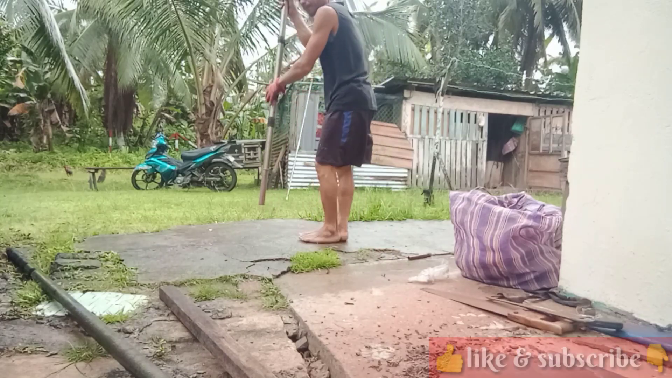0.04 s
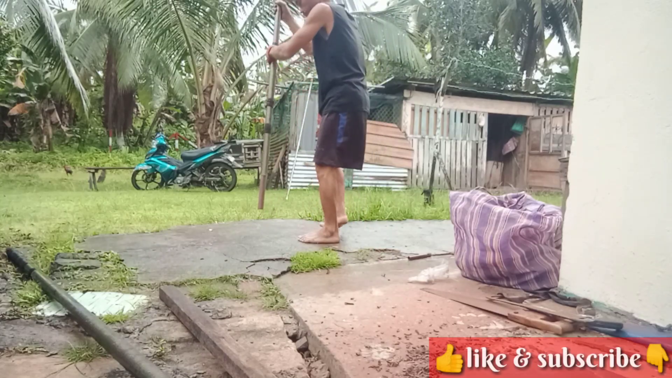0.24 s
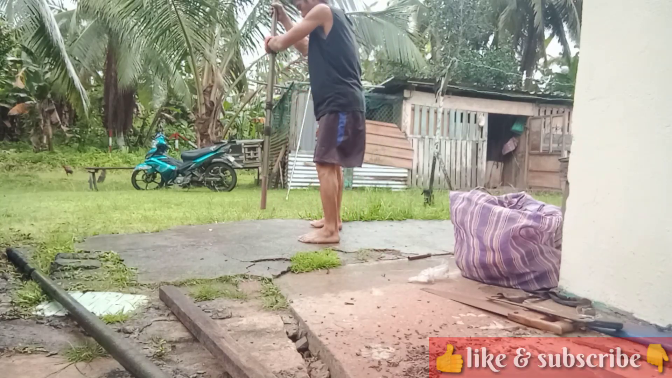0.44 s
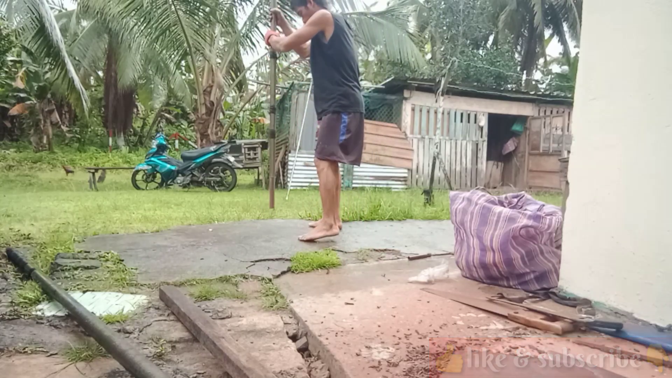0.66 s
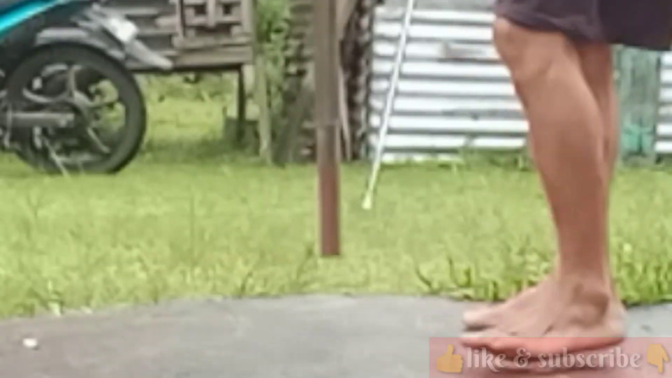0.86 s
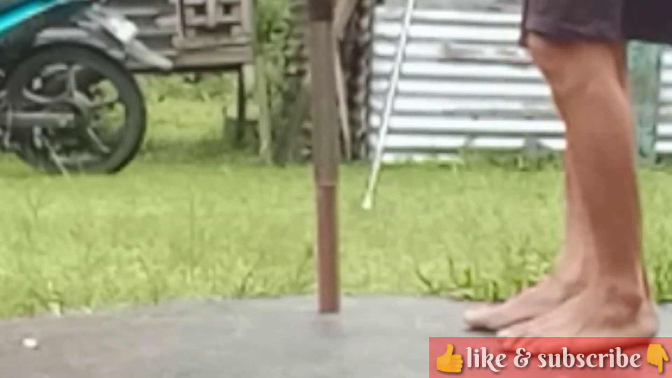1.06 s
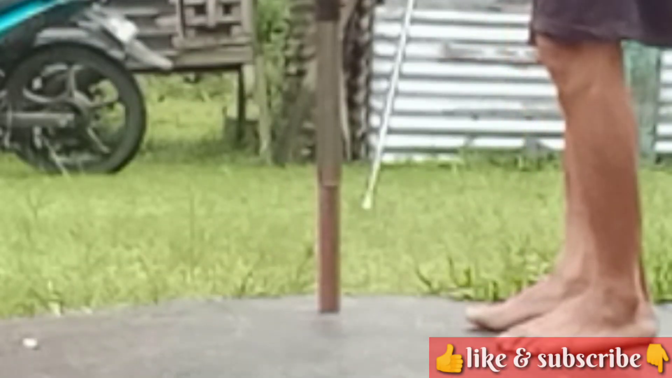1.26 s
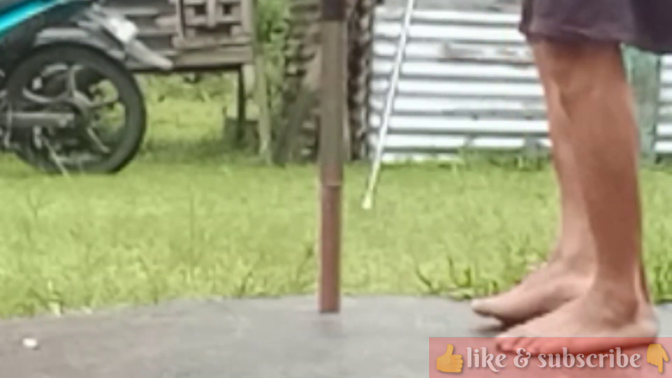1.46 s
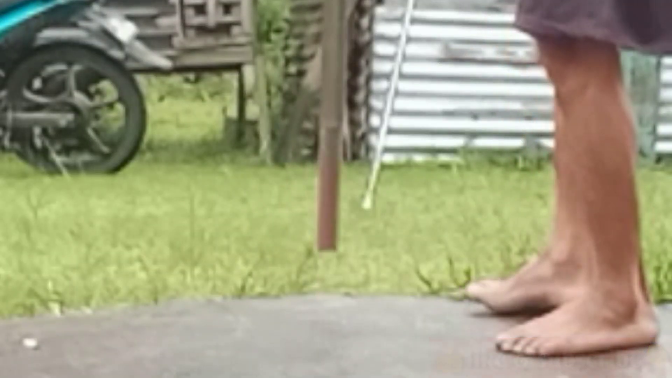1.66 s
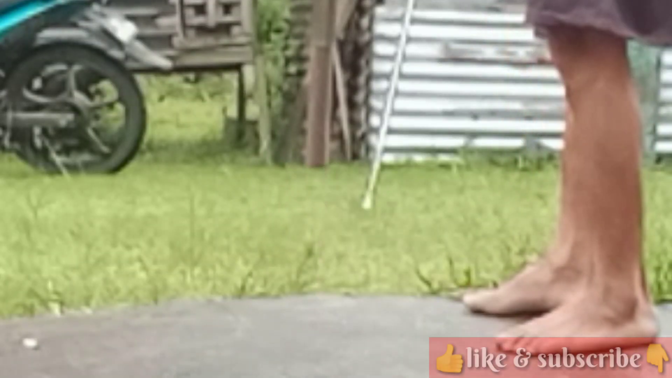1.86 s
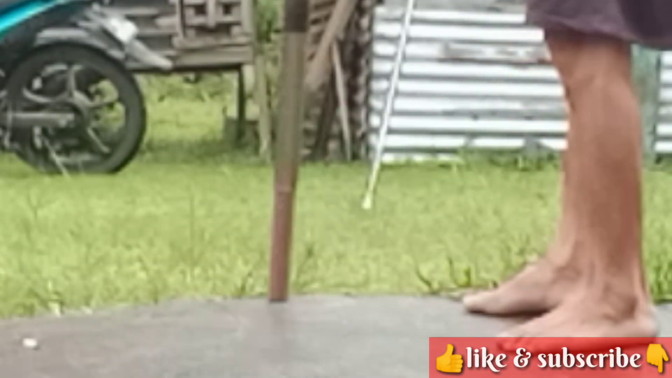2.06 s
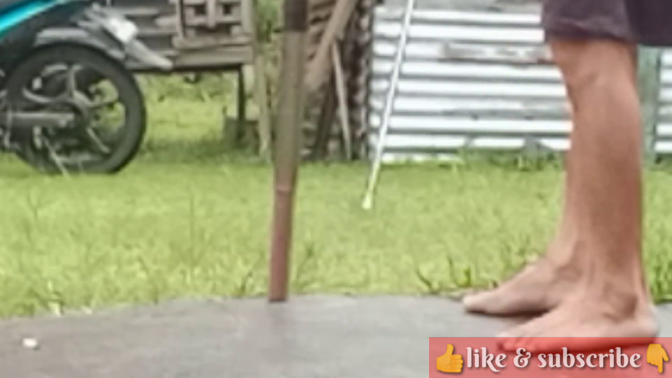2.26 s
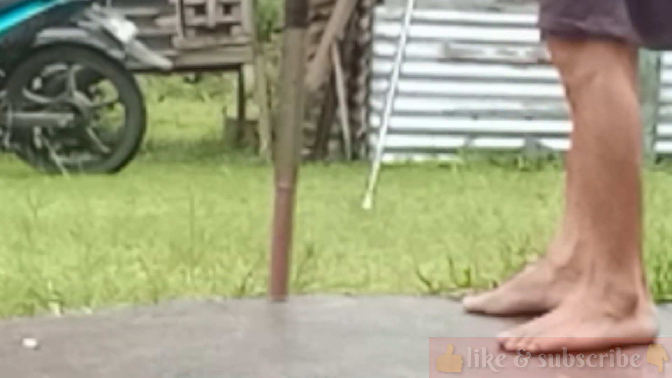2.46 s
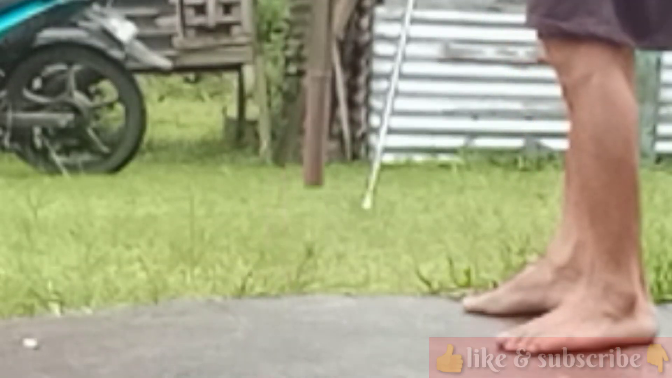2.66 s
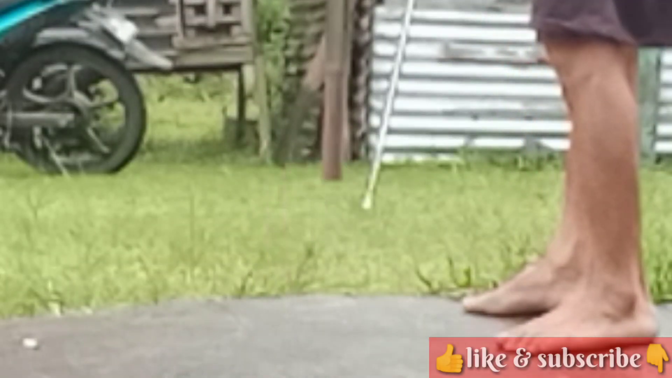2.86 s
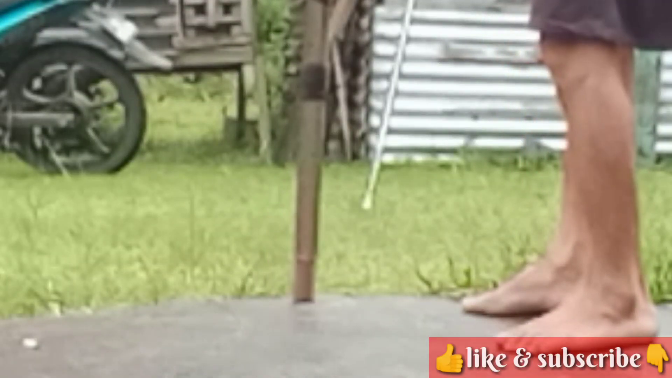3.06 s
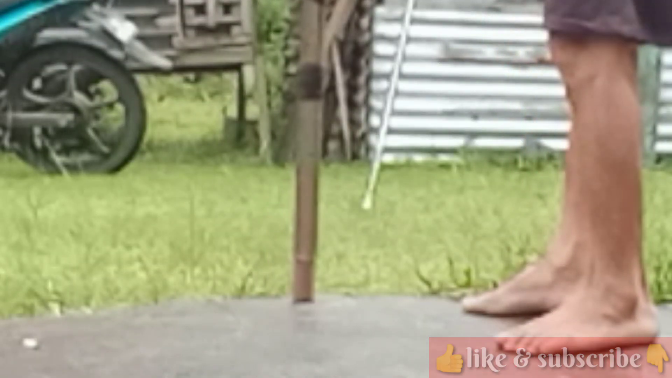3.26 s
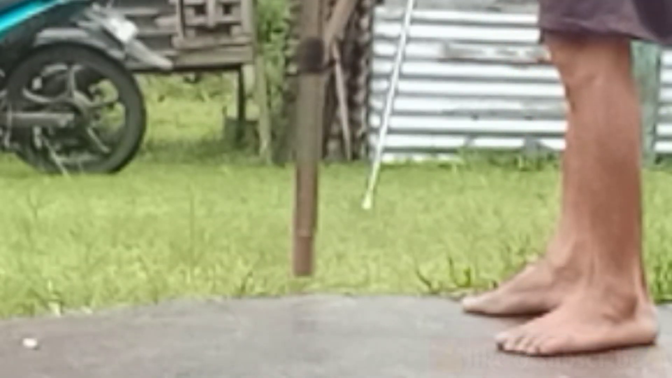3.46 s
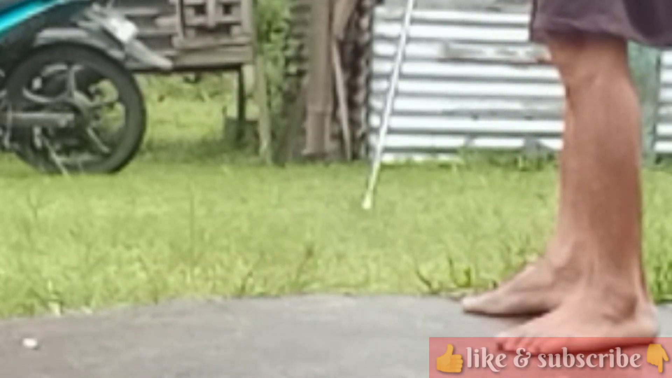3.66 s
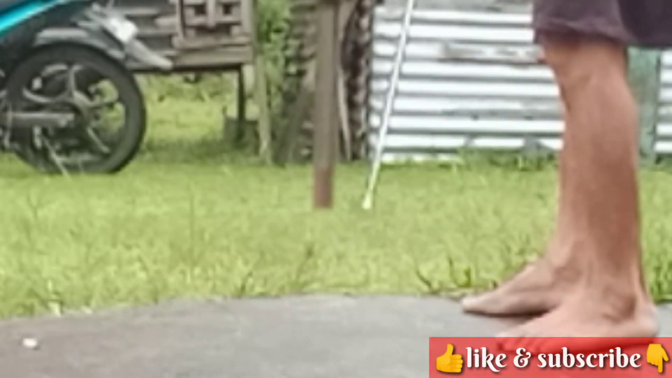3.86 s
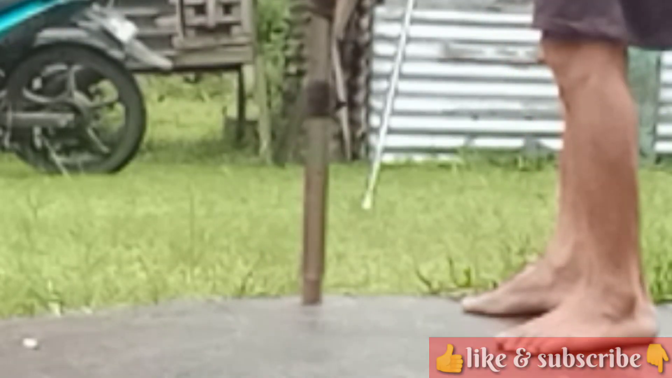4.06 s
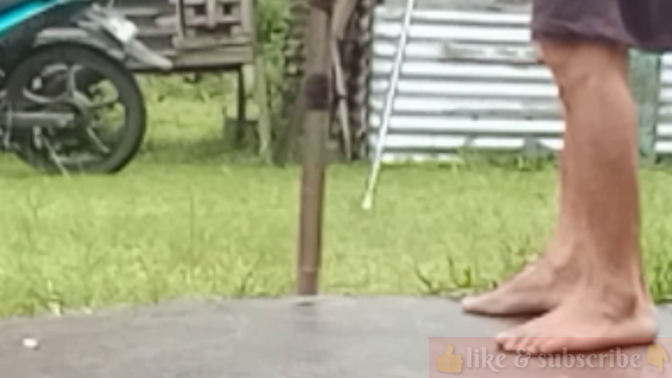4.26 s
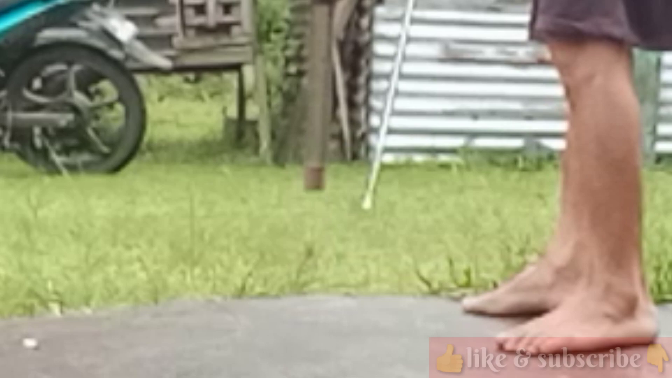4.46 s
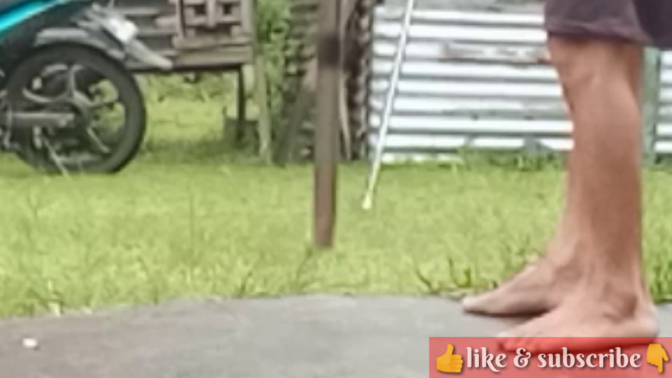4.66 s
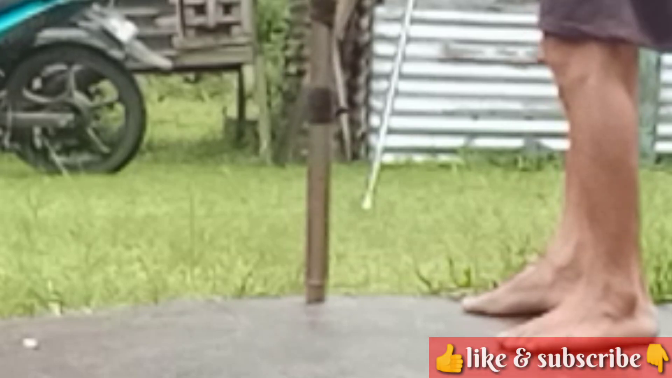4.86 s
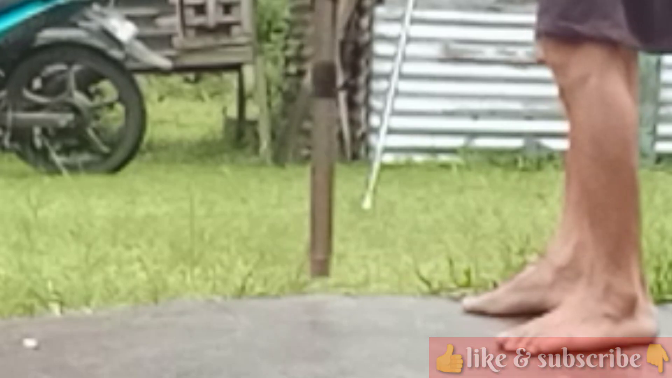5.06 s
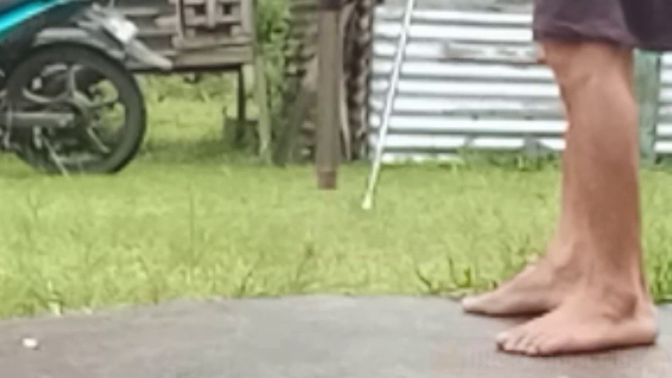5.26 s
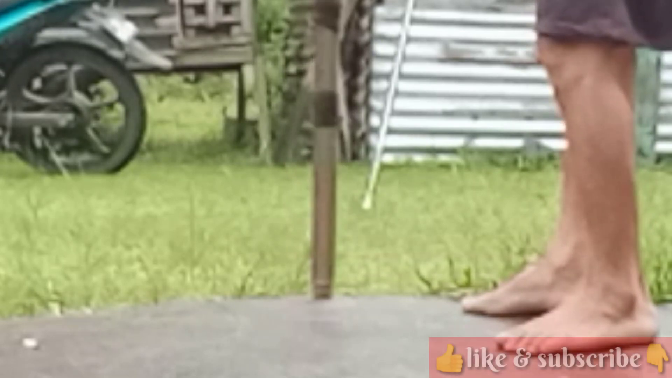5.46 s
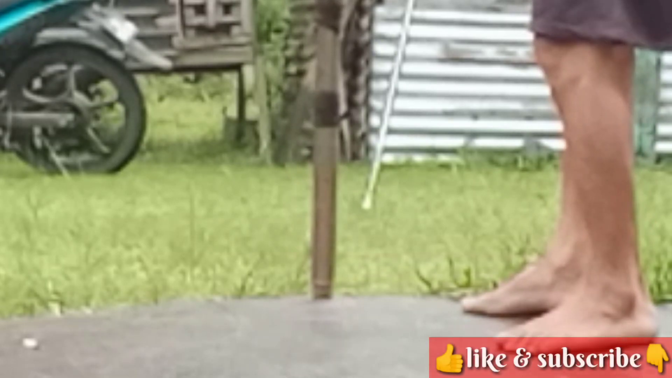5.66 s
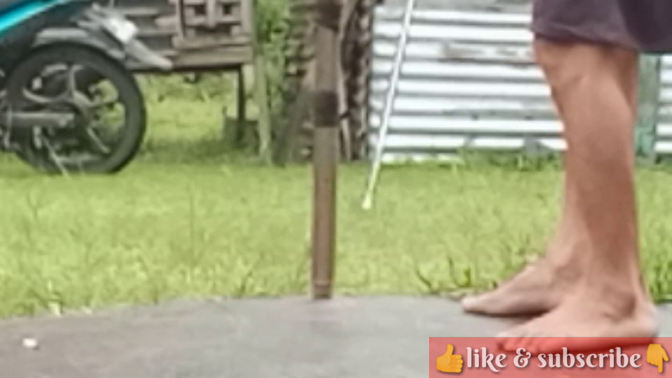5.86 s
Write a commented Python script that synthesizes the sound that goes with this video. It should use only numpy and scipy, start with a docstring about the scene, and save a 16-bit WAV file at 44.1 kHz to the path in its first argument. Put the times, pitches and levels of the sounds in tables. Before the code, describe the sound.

A hollow pipe is rammed end-down on a concrete slab six times outdoors, with sharp overloaded knocks and short echoes over a faint rush.

```python
"""A hollow pipe is rammed end-down on a concrete slab six times, in a yard between sheds.
Each blow is a faint tick, a hollow knock made of decaying sines and noise, a rebound and a low thud.
Clusters of delayed noise make the echoes of walls and trees; the blows overload a narrow-band microphone.
Behind it lie a rush of coloured noise, a rustle, a far sinking hum, and faint gliding chirps and hoots."""
import sys
import numpy as np
from scipy import signal
from scipy.fft import rfft, irfft, next_fast_len
from scipy.io import wavfile
from scipy.ndimage import map_coordinates

SR = 44100
rng = np.random.default_rng(int(sys.argv[2]) if len(sys.argv) > 2 else 0)


def materialize(psi):
    """Save the field psi as 16-bit PCM at rate SR to the path in sys.argv[1].

    A 1-D psi becomes a single channel; in a 2-D psi each row is a channel.
    """
    bounded = np.clip(np.atleast_2d(psi).T, -1, 1)
    quanta = np.round(bounded * 32767).astype(np.int16)
    wavfile.write(sys.argv[1], SR, quanta)


N = 260631  # length of the scene in samples

# All levels in the tables are relative: each sound adds its own overall level.
# Outdoor air, the colour of the rush: (frequency [Hz], level [dB])
AIR_COLOUR = [(18, -65.5), (30, -42.5), (53, -15), (91, -14), (122, -12), (171, -10), (387, -9),
              (421, -8.5), (519, -9.5), (711, -6.5), (1390, -5), (2160, -12.5), (3290, -11.5),
              (4500, -17.5), (5850, -52.5), (9900, -120)]
# Faint chirps and hoots:
# (time [s], length [s], first pitch [Hz], last pitch [Hz], level [dB], pitch scatter [share])
CHIRP_CALLS = [(0.413, 0.092, 426, 391, -38.5, 0.074), (0.93, 0.037, 2200, 1890, -43.5, 0.03),
               (0.932, 0.18, 324, 304, -45, .003), (1.292, 0.02, 420, 372, -44, 0.032),
               (1.6, 0.18, 2580, 2520, -40, 0.059)]
# Ways the pipe, damped by the hands, vibrates: (frequency [Hz], level [dB], time to fall 60 dB [s])
PIPE_MODES = [(578.5, -8, 0.028), (690, -25.5, 0.14), (787, -15, 0.023), (867, -13, 0.053),
              (967, -11.5, 0.059), (1085, -5.5, 0.037), (1269.6, -5.5, 0.03), (1429, -11.5, 0.043),
              (1539, -2, 0.029), (1743, -5.5, 0.029), (1999, -12.5, 0.051), (2267, -6.5, 0.037),
              (2516, -5, 0.031), (2890, -6.5, 0.017), (3080, -24.5, .04), (3236, -8.5, 0.032),
              (3520, -13.5, 0.017), (4080, -23, 0.033)]
# Colour of the grit crushed under the rim: (frequency [Hz], level [dB])
CRACK_COLOUR = [(100, -14.5), (500, -6), (1400, 1.5), (2300, -2.5), (4300, -6.5), (8000, -15)]
# The pipe pings, clatters after a blow or touches the slab in between: (time [s], level [dB], pitch [Hz])
PIPE_TAPS = [(1.529, -41, 3350), (1.976, -35, 1320), (2.035, -38, 600), (3.214, -16, 1850),
             (3.402, -26, 1630), (3.409, -22.5, 1636), (4.8545, 1, 3650), (4.901, -12.5, 1387),
             (4.933, -12, 1420), (5.677, -13, 1500), (5.7413, -12, 1366), (5.756, -16.5, 1307)]
# Colour of the slab taking the weight: (frequency [Hz], level [dB])
THUD_COLOUR = [(20, -23), (55, -31.5), (105, -3.5), (180, -3), (330, -4), (700, -13.5), (1500, -30)]
# Low boom that outlasts the knock: (frequency [Hz], level [dB], time to fall 60 dB [s])
BOOM_TONES = [(100.5, -41.5, .9), (256, -36, 0.41), (382, -30, 0.35)]
# Thin metallic ring that outlasts the knock: (frequency [Hz], level [dB], time to fall 60 dB [s])
METAL_TONES = [(3690, -23.5, .3), (4350, -26, .31)]
# Colour of the echo from the house wall: (frequency [Hz], level [dB])
WALL_COLOUR = [(80, -22), (300, -6.5), (600, 2.5), (1100, -3.5), (1700, -5.5), (2400, -8.5), (3000, -11),
               (3650, -9), (4000, -17.5), (4500, -15)]
# Colour of the echo from sheds and trees: (frequency [Hz], level [dB])
FAR_COLOUR = [(80, -10.5), (350, -15.5), (700, -2.5), (1300, 0.5), (1900, -1), (2600, -15.5), (3600, -17.5),
              (4000, -23), (4500, -18.5)]
# The six blows: (time [s], level [dB], favoured pitch [Hz], hardness of landing [dB], thud level [dB],
# rebound delay [s], boom level [dB], leading tick level [dB], far echo's time to fall 60 dB [s])
PIPE_BLOWS = [(1.1308, 3.5, 1315, -18.5, -16, 0.0061, -23, -33, 0.15),
              (2.210, 3, 1997, 1.5, 1.5, .0085, -23, -24, 0.4),
              (3.113, 0.5, 1575, 2, -4, 0.0053, -17, -27.5, 0.29),
              (4.103, 2.5, 1180, 0, -5.5, 0.011, -5, -22.5, 0.27),
              (4.854, 1.5, 1365, 2.5, 0.5, .0095, -6, -17, 0.4),
              (5.63, 1.5, 1367, 3, 4.5, 0.011, 2.5, -31.5, 0.52)]

HUM_HZ, HUM_SAG_HZ_PER_S = 130.7, 1.8  # starting pitch and how fast it sinks
HUM_DB, HUM_PEAK_S, HUM_FADE_DB_PER_S = -58, 4.2, 2  # swells to its loudest, then recedes
RUSTLE_DB, RUSTLE_RISE_DB_PER_S = -46, 0.5  # starting level before its two parts are weighed, and its rise
RUSTLE_SWELL_DB, SWELLS_PER_S = 1.5, 3.63  # size and pace of its random swells
LEAD_S, LEAD_T60_S = 0.016, 0.09  # the faint tick ahead of each blow
REBOUND_DB, REBOUND_SOFTER_DB = -4, 4.5  # the second edge of the rim against the first
DIRECT_DB, FAVOUR_DB = -0.5, 9.5  # the knock heard straight; lift of the favoured pitch
THUD_DB, THUD_ATTACK_S, THUD_T60_S = -3, 0.0012, 0.04
METAL_DB, METAL_PER_HARDNESS = -6.5, 1.4  # a harder landing rings brighter (dB per dB)
BOOM_DB = 3.5
WALL_DB, WALL_ATTACK_S, WALL_T60_S = -17.5, 0.0015, 0.35
WALL_PER_HARDNESS = 0.23  # a harder landing echoes louder from the wall (dB per dB)
FAR_DB, FAR_DELAY_S, FAR_ATTACK_S = -30.5, 0.073, 0.018
BAND_HZ, TOP_HZ = 4550, 15800  # upper edge of the microphone's band; top of the finished sound


def amp(db):
    """Turn decibels into a gain."""
    return 10 ** (np.asarray(db) / 20)


def unit(x):
    """Scale to an rms (average strength) of 1."""
    return x / np.sqrt(np.mean(x ** 2) + 1e-20)


def fade(t, t60):
    """Die away exponentially, by 60 dB in t60 seconds."""
    return np.exp(-np.log(1000) * t / t60)


def burst(t, attack, t60):
    """Rise quickly, then die away exponentially."""
    return (1 - np.exp(-t / attack)) * fade(t, t60)


def wobble(rate, size):
    """Draw a smooth curve through random points, rate of them a second."""
    points = rng.standard_normal(int(size * rate / SR) + 4)
    return map_coordinates(points, [np.arange(size) * rate / SR])


def filtered(x, response):
    """Multiply the spectrum of x by a gain that depends on frequency."""
    m = next_fast_len(len(x) + 8192)  # spare room so the end does not wrap to the start
    return irfft(rfft(x, m) * response(np.fft.rfftfreq(m, 1 / SR)), m)[:len(x)]


def noise(colour, size, clump_db=0):
    """Coloured noise of rms 1; clump_db gathers it into bursts of about a millisecond."""
    f, db = np.transpose(colour)
    clumps = amp(clump_db * np.clip(wobble(700, size), -2, 2))
    white = rng.standard_normal(size) * clumps
    return unit(filtered(white, lambda hz: amp(np.interp(np.log(hz + 1), np.log(f), db))))


def resonate(x, hz, q):
    """Let one resonance through, with a gain of 1 at its peak."""
    return signal.lfilter(*signal.iirpeak(hz, q, SR), x)


def glide(hz):
    """A sine wave that follows a changing pitch."""
    return np.sin(2 * np.pi * np.cumsum(hz) / SR)


def saturate(x, top, hardness):
    """Round the peaks off at top; more hardness makes a sharper corner."""
    return x / (1 + np.abs(x / top) ** hardness) ** (1 / hardness)


def add(track, s, x):
    """Mix x into the track at time s."""
    part = track[round(s * SR):][:len(x)]
    part += x[:len(part)]


def hum():
    """A far hum, one sine wave, swells and recedes while it sinks in pitch."""
    t = np.arange(N) / SR
    level_db = HUM_DB - HUM_FADE_DB_PER_S * np.abs(t - HUM_PEAK_S) + 1.9 * wobble(5.6, N)
    return amp(level_db) * glide(HUM_HZ - HUM_SAG_HZ_PER_S * t)


def rush():
    """The even outdoor rush is coloured noise whose level barely wavers."""
    return amp(-47.5 + 0.21 * wobble(3.6, N)) * noise(AIR_COLOUR, N)


def rustle():
    """A restless stirring: narrow bands of noise with a faint wandering tone, slowly rising."""
    bands = np.zeros(N)
    for hz in (1180, 1350, 1500):
        # the bands swell and fade by turns
        swell = amp(7.5 * wobble(18, N))
        once = resonate(rng.standard_normal(N), hz, q=2.0)
        bands += swell * resonate(once, hz, q=2.0)
    pitch = 1410 + 85 * wobble(22, N) + 50 * wobble(200, N)
    tone = unit(amp(10 * np.clip(wobble(28, N), -2, 1.3)) * glide(pitch))
    level_db = RUSTLE_DB + RUSTLE_RISE_DB_PER_S * np.arange(N) / SR
    level_db += RUSTLE_SWELL_DB * wobble(SWELLS_PER_S, N)
    return amp(level_db) * (amp(-9) * unit(bands) + amp(-8.5) * tone)


def chirps():
    """Short distant sine glides; random pitch scatter makes some raspy."""
    out = np.zeros(N)
    for s, length, first_hz, last_hz, db, scatter in CHIRP_CALLS:
        size = int(length * SR)
        hz = np.linspace(first_hz, last_hz, size) * (1 + scatter * wobble(580, size))
        add(out, s, amp(db + 2.0) * np.hanning(size) * glide(hz))
    return out


def knock(t, crack_db):
    """One contact: the pipe's modes ring at new strengths, and grit is crushed under its rim."""
    ring = np.zeros(len(t))
    for hz, db, t60 in PIPE_MODES:
        # a soft landing, with little crack, also wakes the upper modes less
        softness_db = 0.73 * min(crack_db, 0) * np.clip((hz - 1800) / 1200, 0, 1)
        strength = amp(db + softness_db + rng.standard_normal())
        ring += strength * fade(t, t60) * np.sin(2 * np.pi * (hz * t + rng.random()))
    crack = amp(crack_db + 1.5) * noise(CRACK_COLOUR, len(t)) * fade(t, 0.047)
    return (ring + crack) * (1 - np.exp(-t / 0.0011))


def tap(t, hz, t60):
    """A light contact of the pipe: a tick and one short tone."""
    tick = knock(t, crack_db=-1.0) * fade(t, 0.41 * t60)
    tone = np.sin(2 * np.pi * hz * t) * burst(t, 0.00091, t60)
    return amp(-1.0) * tick / np.abs(tick).max() + amp(1.5) * tone


def taps():
    """The pipe's lesser contacts, each a tick with a tone."""
    out, t = np.zeros(N), np.arange(SR // 12) / SR
    for s, db, hz in PIPE_TAPS:
        add(out, s, amp(db) * tap(t, hz, t60=0.047))
    return out


def thud(t, thud_db):
    """The slab takes the weight: a short burst of mostly low noise."""
    return amp(THUD_DB + thud_db) * noise(THUD_COLOUR, len(t)) * burst(t, THUD_ATTACK_S, THUD_T60_S)


def after_ring(t, tones, scatter):
    """Narrow tones outlast the knock, unsteady in level and pitch."""
    out = np.zeros(len(t))
    for hz, db, t60 in tones:
        level = amp(db + 2.5 * wobble(60, len(t)))
        out += level * burst(t, 0.0046, t60) * glide(hz * (1 + scatter * wobble(250, len(t))))
    return out


def reflections(t, colour, envelope):
    """A dense cluster of echoes, made of clumped noise with a total energy of 1."""
    tail = noise(colour, len(t), clump_db=3.0) * envelope
    return tail / np.linalg.norm(tail)


def yard(t, hit, hz, hard_db, far_t60):
    """The house wall answers a knock at once, sheds and trees a little later."""
    wall_envelope = burst(t, WALL_ATTACK_S, WALL_T60_S)
    wall = amp(WALL_DB + WALL_PER_HARDNESS * hard_db) * reflections(t, WALL_COLOUR, wall_envelope)
    far_envelope = burst(np.maximum(t - FAR_DELAY_S, 0), FAR_ATTACK_S, far_t60)
    far = amp(FAR_DB) * reflections(t, FAR_COLOUR, far_envelope)
    radiated = amp(-2.5) * hit + amp(6.0) * resonate(hit, hz, q=3.54)
    # convolution repeats the knock at every echo
    return signal.fftconvolve(radiated, wall + far)[:len(t)]


def blows():
    """The rim lands on one edge and rebounds onto the other; each blow favours a pitch, and the slab thuds."""
    out, t = np.zeros(N), np.arange(SR // 2) / SR
    contact = t[:SR // 8]
    for s, db, hz, hard_db, thud_db, rebound_s, boom_db, lead_db, far_t60 in PIPE_BLOWS:
        hit = knock(contact, hard_db)
        rebound = knock(contact, hard_db - REBOUND_SOFTER_DB)
        add(hit, rebound_s, amp(REBOUND_DB) * rebound)
        favoured = (amp(FAVOUR_DB) - 1) * resonate(hit, hz, q=13.1)
        direct = amp(DIRECT_DB) * (hit + favoured)
        metal = amp(METAL_DB + METAL_PER_HARDNESS * hard_db) * after_ring(t, METAL_TONES, scatter=0.01)
        boom = amp(BOOM_DB + boom_db) * after_ring(t, BOOM_TONES, scatter=0.02)
        echoes = yard(t, hit, hz, hard_db, far_t60)
        # the leading tick keeps its own level, apart from the blow's
        add(out, s - LEAD_S, amp(lead_db) * tap(contact, hz, LEAD_T60_S))
        add(out, s, amp(db) * (direct + thud(contact, thud_db)))
        add(out, s, amp(db) * (echoes + metal + boom))
    return out


def scene():
    """Add up everything that reaches the one microphone."""
    return (hum() + rush() + rustle() + chirps() + taps() + blows())[None]


def record(dry):
    """The microphone overloads, its band is narrow, and the peaks then clip near full scale."""
    x = saturate(dry[0], 1.35, hardness=2.34)
    low_cut = signal.butter(2, 45, "high", fs=SR, output="sos")
    x = signal.sosfilt(low_cut, x)
    x = filtered(x, lambda hz: 1 / np.sqrt(1 + (hz / BAND_HZ) ** 56))
    # clipping adds new treble above the microphone's band
    x = saturate(x, 0.98, hardness=24)
    hiss = amp(-79.5) * rng.standard_normal(N)
    return filtered(x + hiss, lambda hz: hz < TOP_HZ)[None]


dry = scene()
out = record(dry)
materialize(out)
```